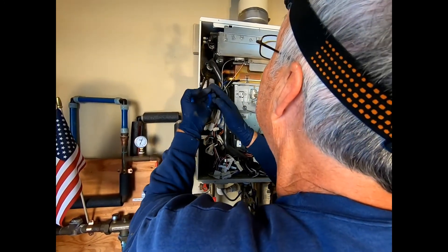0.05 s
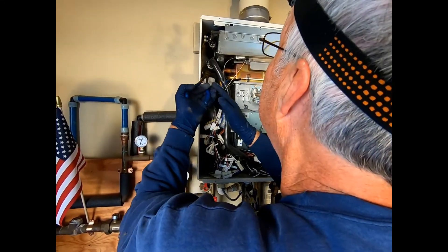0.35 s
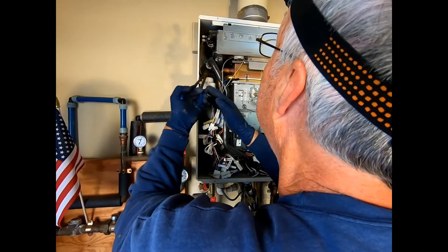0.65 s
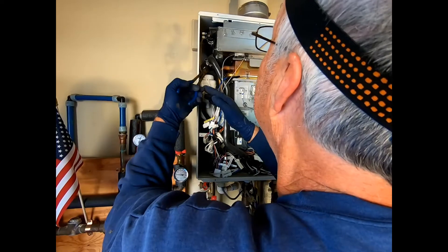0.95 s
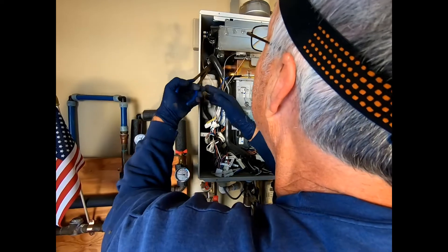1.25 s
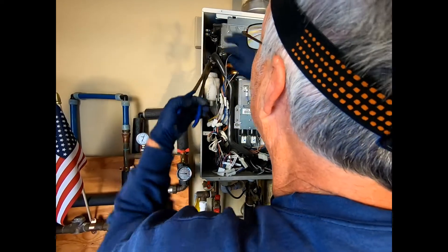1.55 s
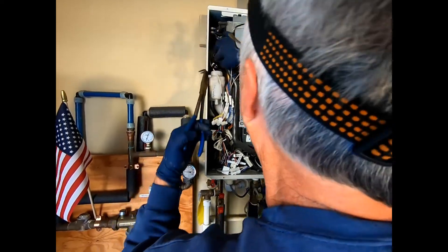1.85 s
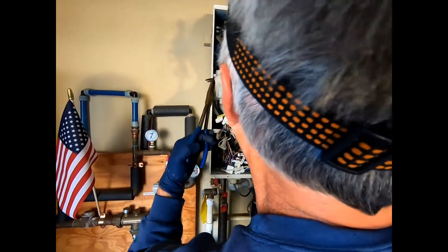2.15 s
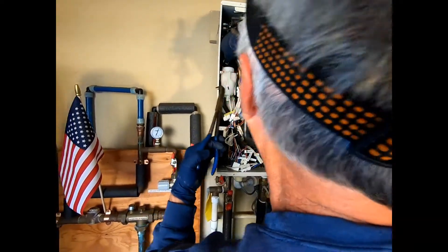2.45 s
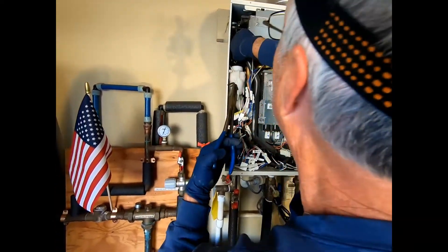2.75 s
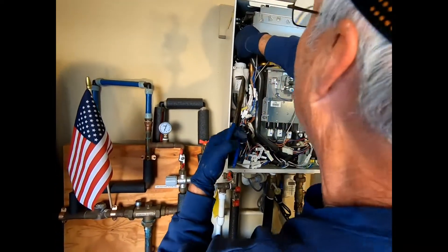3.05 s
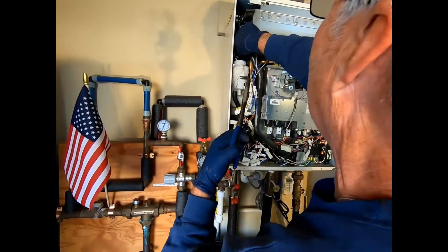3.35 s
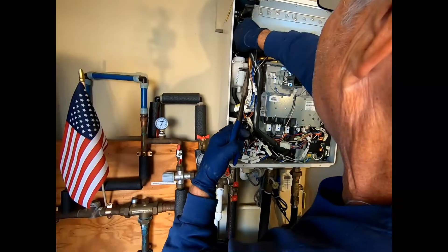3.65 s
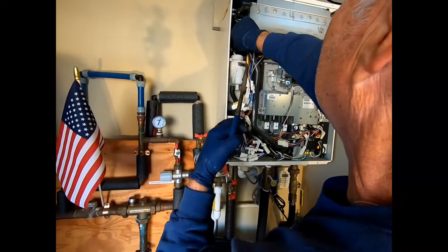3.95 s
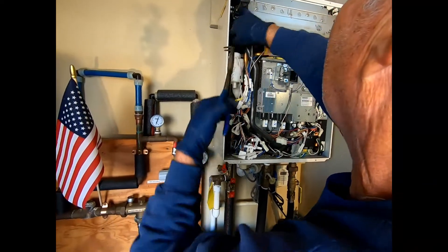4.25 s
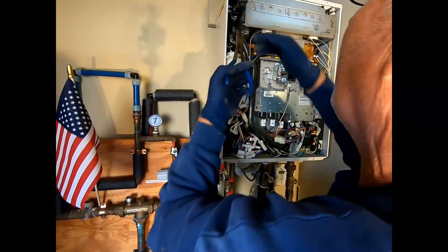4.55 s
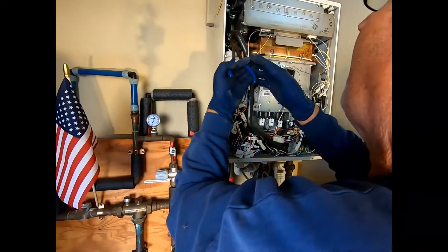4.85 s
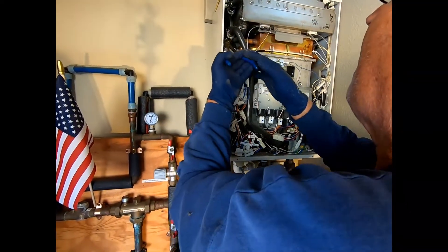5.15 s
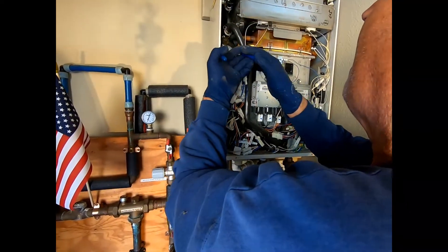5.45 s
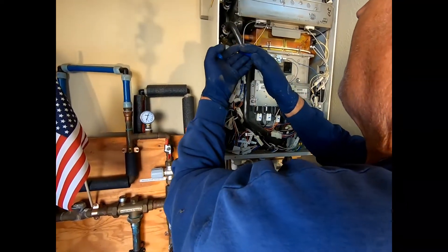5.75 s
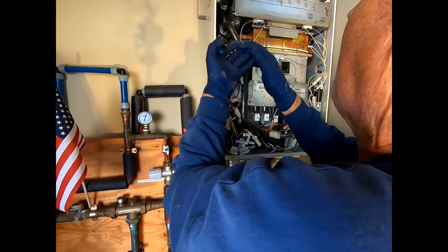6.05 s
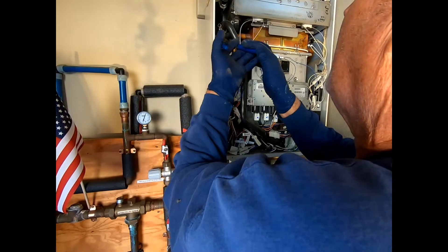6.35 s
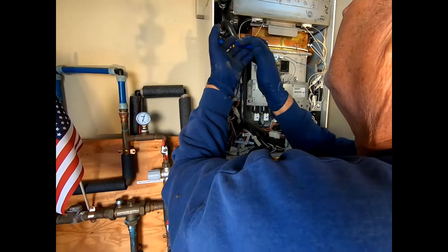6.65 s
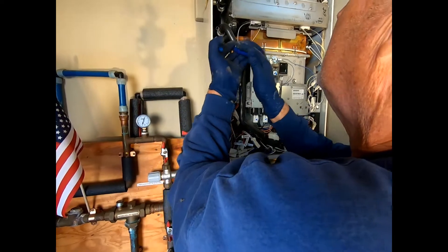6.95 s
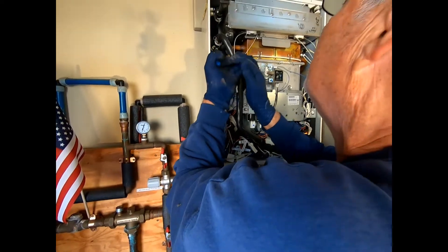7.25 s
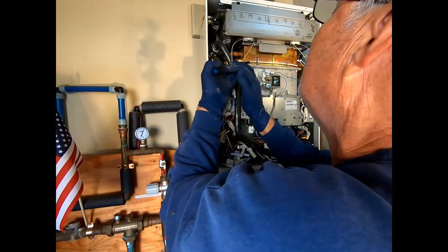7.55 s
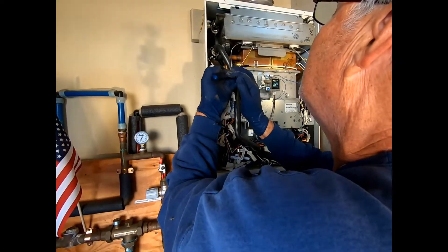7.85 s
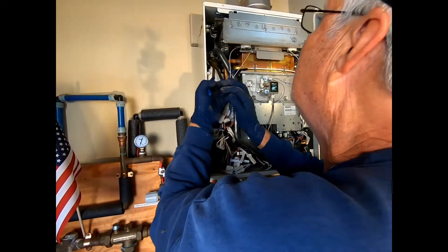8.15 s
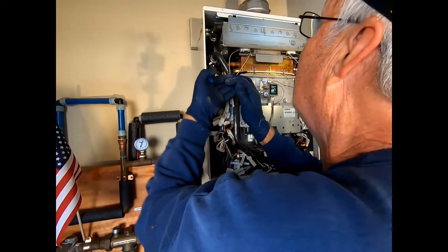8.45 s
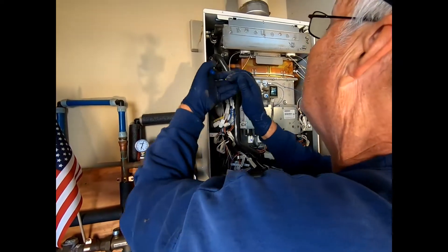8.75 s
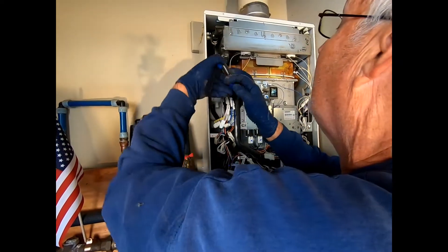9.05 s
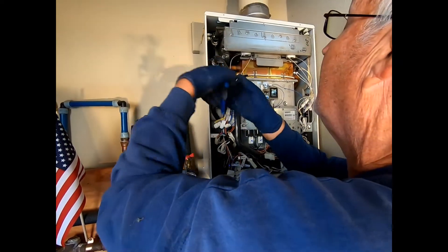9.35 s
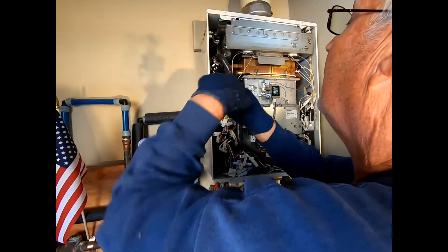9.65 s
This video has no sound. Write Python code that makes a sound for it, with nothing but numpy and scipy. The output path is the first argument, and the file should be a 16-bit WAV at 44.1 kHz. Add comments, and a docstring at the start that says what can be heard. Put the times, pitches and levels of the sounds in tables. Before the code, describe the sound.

Gloved hands work with pliers in an open water heater, close to the microphone in a small, quiet room. Light knocks lead to a cluster of clamp snaps and a brief squeak at about 1 second, as a hose judders off and the sheet-metal cabinet booms. Sleeve swishes and small clicks follow. Around 3 seconds a tight hose is rocked in five soft, even, grinding strokes. A sharp rap on plastic comes at 4.3 seconds, then clicks and a knock around 5.5. A clamp slips with a short ring at 6.4. Hollow knocks bunch up at 8 seconds, the pliers clink sharply at 8.5, and the cabinet takes its hardest thump at 9. A last clamp snaps and twangs brightly at 9.6. Gloves and sleeves rustle throughout, over a deep steady rumble and faint hiss.

```python
"""A small, quiet room, a narrow stereo microphone close to an open wall-hung water heater.
Gloved hands work with pliers: spring clamps snap, hoses judder off and set the sheet-metal cabinet
booming. Near 3 s a tight hose is rocked in five even strokes. A clamp slips after 6 s, the pliers are
jarred at 8.5 s, the cabinet takes its hardest shove at 9 s, and a last clamp twangs.
Gloves and sleeves rub throughout, over a deep steady rumble and a faint hiss."""
import sys
import numpy as np
from scipy import signal
from scipy.fft import rfft, irfft
from scipy.io import wavfile

SR = 44100
rng = np.random.default_rng(int(sys.argv[2]) if len(sys.argv) > 2 else 0)


def master_out(mix):
    """Clip the mix to full scale and print it as 16-bit PCM to the path in sys.argv[1]."""
    frames = np.transpose(np.atleast_2d(mix))
    ceiling = np.clip(frames, -1, 1)
    pcm = np.round(ceiling * 32767).astype(np.int16)
    wavfile.write(sys.argv[1], SR, pcm)


N = 432180
TIME = np.arange(N) / SR

# blows passed on to the cabinet: start_s, level_db, judder_s, best_excited_hz, strong_modes_db,
# hand_damping_db_per_s, tick_db (against the blow)
BLOWS = [(0.383, -48, 0.048, 342, -12.5, -4, -37), (0.78, -48.5, 0.037, 258, -3, 21, -27),
         (1.049, -42, 0.014, 686, -11, 60, -6), (1.055, -37, 0.013, 520, -3, 65, -10.5),
         (1.099, -32.5, 0.027, 610, -4, 35, -8), (1.178, -39, 0.02, 400, -12, 45, -16),
         (1.358, -54.5, 0.025, 406, 13, -4, -30), (2.066, -48, 0.022, 335, -12, 33, -16),
         (2.285, -60, 0.014, 240, 10, 10, -6), (2.545, -54.5, 0.017, 300, -4.5, 31, -14),
         (3.896, -57, 0.014, 800, -19, 37, -5), (4.119, -52, 0.042, 745, -3, 21, -4),
         (5.161, -59.5, 0.014, 312, -21, 26, -2), (5.64, -49.5, 0.0073, 390, -19, 50, -2.5),
         (5.771, -43, 0.012, 388, -12.5, 1, -10), (6.352, -38.5, 0.0088, 330, -14, 64, -5),
         (6.467, -54, 0.0098, 373, -17, 45, -5), (6.529, -60, 0.013, 340, -15, 43, -0.5),
         (6.796, -59.5, 0.012, 345, -10, 62, -3), (7.047, -48.5, 0.021, 347, -15.5, 39, -11),
         (7.315, -54.5, 0.0062, 727, -15.5, 13, -11), (7.985, -38, 0.04, 292, -14, 30, -10),
         (8.058, -37, 0.0095, 370, -6, 25, -17), (8.216, -37.5, 0.012, 473, -14.5, 57, -7),
         (9.022, -33, 0.012, 235, 17, 5, -2.5), (9.107, -40, 0.0067, 270, 8, 25, -14)]
# how strongly sleeves and gloves rustle as the arms move: time_s, level_db
ARM_MOTION = [(0.0, -68.5), (1.0, -63.5), (1.1, -52.5), (1.6, -62), (2.05, -58.5), (2.15, -59), (3.05, -61),
              (3.4, -65.5), (4.2, -57.5), (4.55, -70.5), (4.7, -63), (5.5, -64), (5.75, -60), (6.05, -68.5),
              (6.3, -64), (6.4, -59), (6.55, -63.5), (7.0, -59), (7.25, -82.5), (7.35, -67.5), (7.9, -66),
              (8.0, -58), (8.35, -59.5), (8.65, -52), (8.75, -59.5), (9.05, -53.5), (9.6, -61.5),
              (9.79, -57)]
ROCK_HZ, ROCK_TILT_DB = 705, -8.5  # tone of the rocked hose; slope per octave above it


def cabinet():
    """Each knock is a jolt and a run of small slips; the panels ring on unless a hand damps them."""
    # strong panel modes: pitch_hz, level_db, t60_s
    panel_modes = [(97, -15, .4), (129, -14, .6), (172, -12, .3), (219, -4, .5), (268, -9, .3),
                   (308, -1, .7), (366, -10, .7), (398, -2, .55), (478, -5, .45), (551, -10, .6),
                   (604, -8, .55), (702, -11, .35), (758, -8, .35), (866, -7, .33), (1190, -15, .28),
                   (1325, -13, .25), (1737, -8, .25), (2073, -11, .22)]
    # spectrum of the crowd of weak modes: frequency_hz, density_db
    panel_colour = [(50, -4), (100, -3), (160, -3.5), (220, 0.5), (320, 4), (480, 0.5), (650, -8.5),
                    (900, -12), (1200, -11.5), (1900, -21), (2700, -22), (6000, -45), (14000, -64)]
    # their decay: frequency_hz, t60_s
    panel_decay = [(150, 0.62), (400, 0.37), (1000, 0.59), (2700, 0.07), (8000, 0.062)]
    # hands dragging on the panels: time_s, level_db
    hand_drag = [(0.0, -60), (1.05, -59), (1.15, -46.5), (1.55, -62), (1.95, -63), (2.35, -58.5),
                 (3.6, -68), (4.2, -58), (4.4, -68.5), (5.4, -72.5), (5.85, -52.5), (6.2, -67.5),
                 (6.35, -99), (6.4, -50.5), (6.6, -67), (7.3, -69), (7.4, -57.5), (7.65, -71), (7.85, -65),
                 (8.05, -38.5), (8.35, -66), (8.85, -63), (9.0, -65), (9.1, -39), (9.45, -74), (9.79, -63)]
    strokes = [(s + lag_s, db + return_db, 0.012, ROCK_HZ, -4.5, 96)  # columns as in BLOWS
               for s, db in rocking()
               for lag_s, return_db in ((0, 0), (0.068, -10.5))]  # a second tap as the hand eases back
    out, t = np.zeros((2, N)), TIME[:SR // 4]
    for s, db, judder_s, best_hz, strong_db, damping, *_ in list(BLOWS) + strokes:
        slips = (rng.random(len(t)) < 500 / SR) * rng.standard_normal(len(t))
        slips *= np.exp(-(t / judder_s) ** 2)
        push = from_db(-4) * slips / (np.linalg.norm(slips) + 1e-9)
        push[0] += 1 / (1 + judder_s / 0.02)  # a long slide starts softly
        strong = from_db(strong_db) * ringing(favoured(panel_modes, best_hz), spread_db=0.5)
        weak = dying_noise(favoured(panel_colour, best_hz), panel_decay)
        boom = convolve(push, (strong + weak) * from_db(-max(damping, 0) * TIME[:SR]))
        add(out, s, from_db(db - 0.5) * boom / np.std(boom[:, :SR // 10]))
    drag = from_db(in_time(hand_drag)) * grain(depth_db=1.5, per_s=60)
    return out + drag * noise(panel_colour)


def thuds(rise_s=0.0022):
    """Slow pushes move the whole cabinet on its wall mounting."""
    # shoves: start_s, level_db, t60_s
    shoves = [(1.139, -47, 0.49), (2.27, -48, 0.5), (4.269, -54, 0.42), (5.148, -49.5, 0.19),
              (5.775, -46, 0.2), (7.401, -57.5, 0.57), (7.998, -63, .33), (9.023, -27.5, 0.2)]
    # their dull spectrum: frequency_hz, density_db
    colour = [(40, -18), (70, -12), (120, -7), (220, -12.5), (330, -6), (700, -82), (3000, -91)]
    out, t = np.zeros((2, N)), TIME[:SR // 2]
    for s, db, t60 in shoves:
        add(out, s, from_db(db - 60 * t / t60) * (1 - np.exp(-t / rise_s)) * noise(colour, len(t)))
    return out


def clicks(crack_s=0.000078, contact_s=0.00028):
    """Hard contacts: a sharp crack, then the short dense ring of the part."""
    # jaws and clamps snapping: start_s, level_db, lowest_hz, tilt_db_per_octave, t60_s
    snaps = [(0.2514, -51, 3960, 0, 0.012), (0.381, -49, 960, -12.5, 0.21), (1.049, -34.5, 740, -12, 0.086),
             (1.056, -27, 506, -21, 0.085), (1.098, -25.5, 900, -10.5, 0.071),
             (1.248, -48.5, 1520, -7, 0.097), (1.34, -55, 2000, 3, 0.18), (2.067, -45, 1300, -1, 0.03),
             (2.117, -45, 1620, -4, 0.037), (2.286, -47, 6500, -13, 0.012), (2.314, -51.5, 1300, -4, 0.035),
             (2.391, -45, 1290, -5.5, 0.08), (4.2535, -27, 1500, -7.5, 0.03),
             (4.463, -45.5, 1660, -12, 0.02), (4.497, -51, 1900, -6, 0.034), (4.694, -59, 2000, -7, 0.05),
             (4.895, -55.5, 1400, -10, 0.06), (5.162, -55.5, 2500, -1, 0.066),
             (5.2978, -35.5, 2800, -3, 0.015), (5.5109, -29.5, 2440, -5, 0.0058),
             (5.640, -33, 1300, 0.5, 0.023), (5.7715, -37, 1090, -10, 0.045),
             (6.349, -35.5, 4470, -8, 0.056), (6.368, -25, 1070, -6, 0.031),
             (6.467, -49.5, 1500, -7.5, 0.03), (6.505, -56.5, 6000, -1, 0.072),
             (6.814, -41.5, 2400, -7.5, 0.039), (7.05, -40, 1500, -4, 0.013),
             (7.301, -54, 3020, -0.5, 0.039), (7.417, -57, 1500, 2, 0.063), (7.9487, -41, 3070, -3, 0.043),
             (7.989, -35.5, 1510, -11, 0.025), (8.019, -42, 1500, -2, 0.092), (8.069, -45, 1400, -4, .04),
             (8.227, -28.5, 930, -6.5, 0.026), (8.4885, -40.5, 4080, -4, 0.25),
             (8.5145, -20, 4630, -6, 0.021), (8.516, -28, 957, -3, 0.07), (8.7138, -33, 1390, -2.5, 0.019),
             (9.019, -30.5, 900, 0.5, 0.14), (9.449, -40.5, 1230, -6.5, 0.024),
             (9.643, -17, 3000, 2, 0.014), (9.648, -35, 3500, -3, 0.02), (9.663, -34, 3200, -11, 0.042)]
    blow_ticks = [(s, db + tick_db, 1010, -5.5, 0.11) for s, db, *_, tick_db in BLOWS]
    hose_catches = [(s, db + 9.5, ROCK_HZ, ROCK_TILT_DB, 0.095) for s, db in rocking()]
    brushes = [(s, db, 1860, -2.5, 0.045) for s, db in touches()]
    out, t = np.zeros((2, N)), TIME[:SR // 5]
    rise = 1 - np.exp(-t / contact_s)
    for s, db, lowest_hz, tilt_db, t60 in list(snaps) + blow_ticks + hose_catches + brushes:
        fall = from_db(-60 * t / t60) + np.exp(-t / crack_s)
        snap = rise * fall * noise(part_colour(lowest_hz, tilt_db, db), len(t))
        low_cut = signal.butter(2, lowest_hz / 2, "high", fs=SR, output="sos")
        add(out, s, from_db(db) * signal.sosfilt(low_cut, snap))
    return out


def pliers():
    """The steel pliers ring when jarred."""
    # jolts: start_s, level_db
    hits = [(8.516, -30), (9.021, -39)]
    # modes of the tool: pitch_hz, level_db, t60_s
    modes = [(1082, -6, .18), (1912, -3, .13), (2021, -6, .17), (2236, -10, .09), (2658, -7, .095),
             (4048, -17, .1), (4448, 0, .05), (4599, -2, .07), (4708, -5, .05), (5017, -4, .045),
             (6063, -3, .05), (7341, -10, .05), (12090, -16, .08)]
    return steel(hits, modes)


def clamps():
    """A spring clamp twangs, or rings in close-set modes as it slips in the jaws."""
    # twangs: start_s, level_db
    twangs = [(9.6431, -38), (9.663, -47)]
    # modes of the twang: pitch_hz, level_db, t60_s
    twang_modes = [(1505, -18, .25), (4063, -3, .06), (4150, -3, .1), (5200, -2, .09), (5262, 3, .11),
                   (5305, -2, .1), (7580, -10, .15), (8247, -8, .13), (11400, -5, .12), (11850, -3, .1),
                   (12350, -5, .1)]
    # slips: start_s, level_db
    slips = [(6.349, -43), (6.369, -45)]
    # modes of the slip: pitch_hz, level_db, t60_s
    slip_modes = [(4340, -4, .08), (4457, 0, .14), (4662, -3, .15), (5500, -6, .05), (7400, -8, .06),
                  (8193, -12, .11), (8403, -9, .07)]
    return steel(twangs, twang_modes) + steel(slips, slip_modes)


def steel(hits, modes, twin_db=-9, detune=0.008):
    """Each steel mode beats with a weaker twin and chatters against the grip."""
    out, size = np.zeros((2, N)), SR // 3
    for s, db in hits:
        for hz, mode_db, t60 in modes:
            twin_hz = hz * (1 + detune * rng.standard_normal())
            pair = ringing([(hz, mode_db, t60), (twin_hz, mode_db + twin_db, t60)], spread_db=2.5)
            add(out, s, from_db(db) * pair[:size] * grain(depth_db=8, per_s=220, size=size))
    return out


def loose_parts(wander=0.026):
    """Metal, fitting and hose ring while they still rub, so pitch and strength waver."""
    # metal squeaking as it slips: start_s, level_db, pitch_hz, t60_s
    squeaks = [(1.108, -28.5, 5080, 0.045), (2.395, -43, 2610, 0.096), (4.297, -49.5, 1800, 0.19),
               (6.815, -42, 2890, .025), (6.822, -42, 3120, .02), (7.956, -43, 1019, 0.59),
               (7.962, -45, 3010, .15)]
    # raps on a plastic fitting: start_s, level_db
    raps = [(4.2535, -31), (5.639, -39), (6.368, -40), (9.025, -36)]
    # modes of the fitting: pitch_hz, level_db, t60_s
    fitting_modes = [(1164, -9, 0.042), (1380, -2, .03), (1622, 5, 0.038), (1800, 1, 0.04)]
    # bumps on the freed hose: start_s, level_db
    bumps = [(1.354, -51), (1.378, -43.5)]
    # its hollow modes: pitch_hz, level_db, t60_s
    hose_modes = [(385, 6, 0.24), (798, -10, 0.23), (866, -9, 0.29)]
    rings = list(squeaks)
    for hits, modes in (raps, fitting_modes), (bumps, hose_modes):
        rings += [(s, db + mode_db, hz, t60) for s, db in hits for hz, mode_db, t60 in modes]
    out, t = np.zeros((2, N)), TIME[:SR // 4]
    for s, db, hz, t60 in rings:
        bend = np.interp(t * 250, np.arange(len(t)), rng.standard_normal(len(t)))
        tone = np.sin(2 * np.pi * np.cumsum(hz * (1 + wander * bend)) / SR)
        add(out, s, from_db(db - 60 * t / t60) * grain(depth_db=2.5, per_s=150, size=len(t)) * tone)
    return out


def rocking(start_s=2.768, period_s=0.157, strokes=5, middle_db=-53, fade_db=3.5):
    """A tight hose is rocked in even strokes, the middle one hardest: start_s, level_db."""
    middle = (strokes - 1) / 2
    return [(start_s + k * period_s, middle_db - fade_db * abs(k - middle)) for k in range(strokes)]


def hose_grind():
    """The rocked hose grinds on its fitting."""
    # swells of friction: peak_s, level_db, half_length_s
    grinds = [(2.84, -59, 0.072), (3.1, -61, 0.097)]
    # their spectrum: frequency_hz, density_db
    colour = [(300, -11), (650, 0), (1500, 3), (2500, -2.5), (4000, -31), (10000, -36)]
    return swells(grinds) * grain(depth_db=1, per_s=140) * noise(colour)


def scuffs():
    """Short grainy slides swell and fade; one also follows each blow and each rocking stroke."""
    # hose and glove sliding over parts: peak_s, level_db, half_length_s, lowest_hz, tilt_db_per_octave
    slides = [(0.205, -67, 0.028, 774, -2.5), (0.58, -69.5, 0.016, 1500, -9.5),
              (0.81, -64.5, 0.041, 1060, -8), (0.893, -66.5, 0.012, 2190, -8),
              (1.111, -37.5, 0.0083, 2600, -1), (1.122, -41.5, 0.022, 770, -10.5),
              (2.03, -63, 0.089, 1520, 2), (2.402, -56.5, 0.025, 674, -3.5), (2.565, -60, 0.043, 1340, -4),
              (2.776, -53, 0.015, 1100, -4), (4.148, -60, 0.013, 730, -17), (4.285, -59, 0.045, 1600, -8),
              (4.315, -70, 0.028, 1760, -34), (4.49, -69, 0.024, 2500, -3), (4.72, -77, 0.069, 1500, -5.5),
              (4.92, -73, 0.073, 1300, -6.5), (5.35, -81, 0.036, 2520, -1.5),
              (6.378, -58.5, 0.033, 1400, -0.5), (6.384, -50, 0.012, 870, -5.5),
              (6.81, -68, 0.059, 1600, -13), (7.03, -62, 0.011, 2000, -3.5), (7.99, -56.5, 0.041, 815, -3),
              (8.06, -51, 0.023, 800, -4), (8.6, -60.5, 0.04, 1700, -2), (8.685, -58.5, 0.013, 2500, -2),
              (9.04, -38, 0.015, 1760, -33), (9.045, -41, 0.016, 744, -16),
              (9.432, -62.5, 0.02, 2030, -3.5), (9.663, -43.5, .026, 3800, 5.5)]
    skids = [(s + 0.017, db + tick_db - 5.5, 0.018, 690, -5.5) for s, db, *_, tick_db in BLOWS]
    rubs = [(s + 0.055, db - 6, 0.021, ROCK_HZ, ROCK_TILT_DB) for s, db in rocking()]
    out, t = np.zeros((2, N)), TIME[:2 * SR // 5]
    for s, db, half_s, lowest_hz, tilt_db in list(slides) + skids + rubs:
        lead_s = min(s, t[-1] / 2)
        swell = np.exp(-((t - lead_s) / half_s) ** 2 / 2) * grain(depth_db=2.5, per_s=400, size=len(t))
        friction = noise(part_colour(lowest_hz, tilt_db, db), len(t))
        add(out, s - lead_s, from_db(db + 3.5) * swell * friction)
    return out


def touches(count=40, above_rustle_db=2, spread_db=5):
    """Fingers and tool brush parts at random, harder when the arms move more: start_s, level_db."""
    times = rng.uniform(0, N / SR, count)
    levels = in_time(ARM_MOTION, times) + above_rustle_db + spread_db * rng.standard_normal(count)
    return zip(times, levels)


def rustle(gain_db=-3.5, creaks_per_s=35, creak_db=-7, creak_t60_s=0.18):
    """Cloth hisses as it slides, and the rubber gloves add scattered tiny creaks."""
    # spectrum of the cloth: frequency_hz, density_db
    colour = [(300, 15), (800, 13), (1500, 12), (2500, 7.5), (5000, 3), (9200, -8), (11000, -0.5),
              (14500, -73)]
    catches = (rng.random(N) < creaks_per_s / SR) * rng.uniform(0, 1, N)
    bursts = convolve(catches, [from_db(-60 * TIME[:SR // 10] / creak_t60_s)])
    creaks = rms_one(bursts * noise(part_colour(lowest_hz=1300, tilt_db=0.27, level_db=-66)))
    slide = grain(depth_db=2.5, per_s=170) * noise(colour)
    return from_db(in_time(ARM_MOTION) + gain_db) * (slide + from_db(creak_db) * creaks)


def swishes():
    """Sleeves drag over edges and gloves glide: a bright hiss, scratchy as the threads catch."""
    # sleeves swishing past: peak_s, level_db, half_length_s
    sleeves = [(1.752, -52, 0.025), (1.885, -60, 0.014), (1.96, -60, 0.02), (2.03, -58, 0.016),
               (2.4, -56, 0.022), (2.49, -60.5, 0.015), (2.57, -54, 0.027), (4.128, -51.5, 0.016),
               (4.175, -57.5, 0.037), (9.316, -55, .042)]
    # their spectrum: frequency_hz, density_db
    sleeve_colour = [(1000, -1), (4000, -8), (8000, 6), (11000, 2.5), (14500, -6)]
    # gloves gliding lightly: peak_s, level_db, half_length_s
    gloves = [(3.62, -70.5, 0.066), (3.79, -64, 0.054), (3.94, -68, 0.041), (4.04, -72, 0.037),
              (5.83, -73, 0.03), (5.94, -65.5, 0.055)]
    # their spectrum: frequency_hz, density_db
    glove_colour = [(1000, -5), (4000, -5), (8000, -2), (9600, 4), (10600, 3), (11800, -25), (14500, -19)]
    scratch = grain(depth_db=4, per_s=1200) * grain(depth_db=3, per_s=70)
    return scratch * (swells(sleeves) * noise(sleeve_colour) + swells(gloves) * noise(glove_colour))


def room(x, wet_db=-5.5, build_s=0.0006):
    """Near walls return a short tail to the microphone."""
    # spectrum of the tail: frequency_hz, density_db
    colour = [(200, -19), (2000, 2.5), (6000, 6.5), (14000, 7)]
    # its decay: frequency_hz, t60_s
    decay = [(200, 0.68), (2000, 0.11), (6000, 0.11), (14000, 0.079)]
    tail = dying_noise(colour, decay) * (1 - np.exp(-TIME[:SR] / build_s))
    return from_db(wet_db) * convolve(x, tail / np.linalg.norm(tail[0]))


def room_tone():
    """A deep steady rumble and a faint hiss."""
    # spectrum of the rumble: frequency_hz, density_db
    rumble = [(3, 0.5), (8, 4), (14, -6.5), (20, -5.5), (30, -12.5), (45, -22), (65, -46), (100, -42.5),
              (200, -85)]
    # spectrum of the hiss: frequency_hz, density_db
    hiss = [(60, 15.5), (150, -0.5), (350, -5.5), (600, -10), (1500, -19), (4000, -39), (9000, -45),
            (14000, -48)]
    return from_db(-35) * noise(rumble) + from_db(-67.5) * noise(hiss)


def noise(colour, size=N):
    """Narrow stereo noise with a given spectrum; rms 1."""
    # stereo width, greatest in the treble: frequency_hz, side_minus_mid_db
    width = [(30, -39), (100, -27), (300, -29), (1000, -20), (4000, -15), (8000, -13), (10500, -10),
             (13000, -5)]
    hz = np.fft.rfftfreq(size, 1 / SR)
    mid, side = rfft(rng.standard_normal((2, size))) * from_db(at_hz(colour, hz))
    side = side * from_db(at_hz(width, hz))
    return rms_one(irfft(np.array([mid + side, mid - side]), size))


def part_colour(lowest_hz, tilt_db, level_db, ripple_db=2.8):
    """A small part gives little sound below its lowest ring, and uneven resonances on a slope above."""
    hz = np.geomspace(100, 16000, 150)
    octaves = np.log2(hz / lowest_hz)
    slope = np.where(octaves < 0, 26, tilt_db) * octaves
    # gentle contacts lack the very top
    softness = -0.23 * max(18.5 - level_db, 0) * np.maximum(np.log2(hz / 9500), 0)
    return np.c_[hz, slope + softness + ripple_db * rng.standard_normal(len(hz))]


def favoured(rows, best_hz, focus_db=8.5, octaves=0.66):
    """The spot that is struck lifts the resonances near one frequency."""
    rows = np.array(rows, float)
    rows[:, 1] += focus_db * np.exp(-(np.log2(rows[:, 0] / best_hz) / octaves) ** 2)
    return rows


def dying_noise(colour, t60s):
    """A dense crowd of modes: each octave dies away at its own pace."""
    t, hz = TIME[:SR], np.fft.rfftfreq(SR, 1 / SR)
    spectrum, centres = rfft(noise(colour, SR)), np.geomspace(100, 12800, 8)
    bands = [at_hz(np.c_[centres, one], hz) for one in np.eye(len(centres))]
    return sum(irfft(spectrum * band, SR) * from_db(-60 * t / at_hz(t60s, centre))
               for centre, band in zip(centres, bands))


def ringing(modes, spread_db):
    """One second of decaying sines, each struck with a strength of its own."""
    out, t = np.zeros(SR), TIME[:SR]
    for k, (hz, db, t60) in enumerate(modes):
        envelope = from_db(db + spread_db * rng.standard_normal() - 60 * t / t60)
        out += (-1) ** k * envelope * np.sin(2 * np.pi * hz * t)
    return out


def grain(depth_db, per_s, size=N):
    """Friction catches and lets go: an uneven gain of unit power."""
    steps = np.clip(rng.standard_normal(size), -2, 2)
    return rms_one(from_db(depth_db * np.interp(TIME[:size] * per_s, np.arange(size), steps)))


def swells(rows):
    """Gain that rises and falls around each peak."""
    return sum(from_db(db) * np.exp(-((TIME - s) / half_s) ** 2 / 2) for s, db, half_s in rows)


def in_time(curve, times=TIME):
    """Join the points of a curve by straight lines."""
    return np.interp(times, *np.transpose(curve))


def at_hz(points, hz):
    """Read a table on a log-frequency axis."""
    known_hz, values = np.transpose(points)
    return np.interp(np.log(hz + 1e-9), np.log(known_hz), values)


def from_db(db):
    """Decibels to gain."""
    return 10 ** (np.asarray(db) / 20)


def rms_one(x):
    """Scale to unit power."""
    return x / np.sqrt(np.mean(x ** 2) + 1e-20)


def add(out, s, sound):
    """Mix a sound in from time s on."""
    start = max(round(s * SR), 0)
    part = sound[..., :N - start]
    out[..., start:start + part.shape[-1]] += part


def convolve(x, response):
    """Send a signal through an impulse response."""
    return signal.fftconvolve(np.atleast_2d(x), response, axes=-1)[:, :N]


def scene():
    """All that reaches the microphone; only the tool and hose sounds carry the room's tail."""
    parts = clicks() + scuffs() + hose_grind() + loose_parts() + pliers() + clamps()
    background = room_tone()
    cloth = rustle() + swishes()
    return cabinet() + thuds() + parts + room(parts) + cloth + background


def record(dry, dip_hz=10250, dip_share=0.62, dip_q=9, cutoff_hz=14500):
    """The microphone has a hollow in the high treble; the top is cut steeply."""
    notched = signal.lfilter(*signal.iirnotch(dip_hz, dip_q, fs=SR), dry)
    coloured = dry + dip_share * (notched - dry)
    return signal.sosfilt(signal.ellip(10, .1, 90, cutoff_hz, fs=SR, output="sos"), coloured)


dry = scene()
out = record(dry)
master_out(out)
```